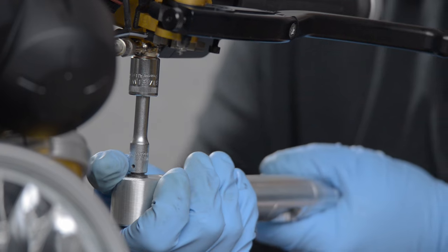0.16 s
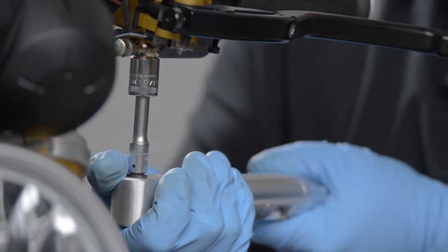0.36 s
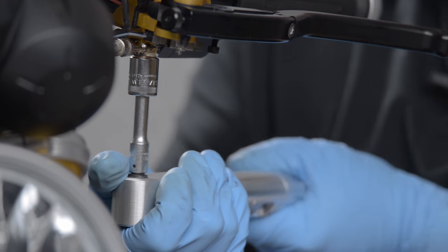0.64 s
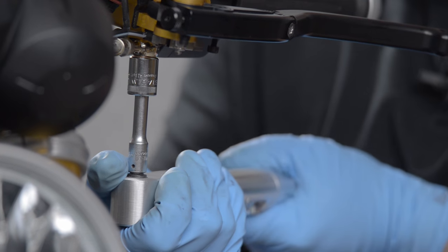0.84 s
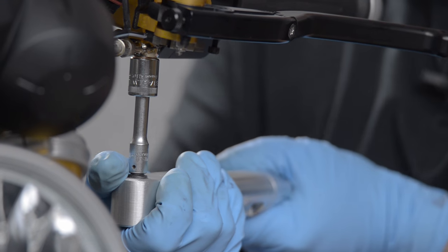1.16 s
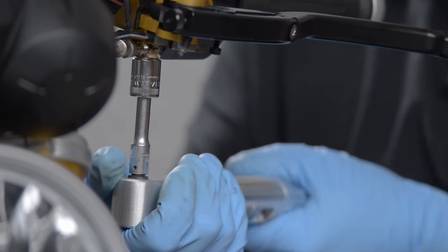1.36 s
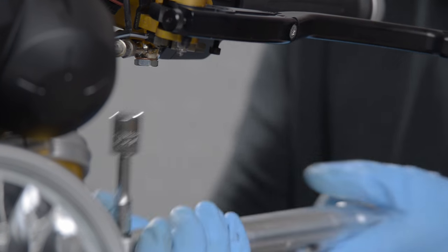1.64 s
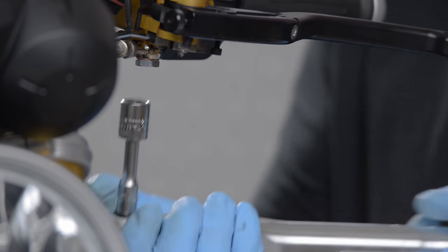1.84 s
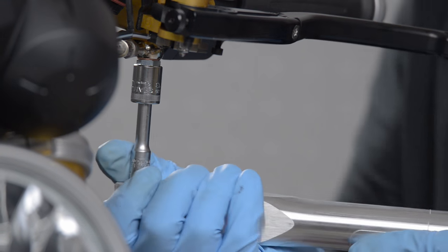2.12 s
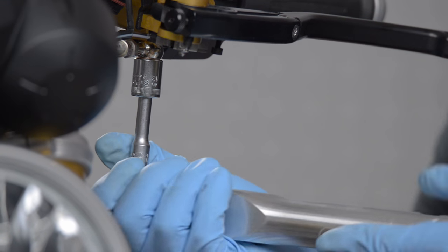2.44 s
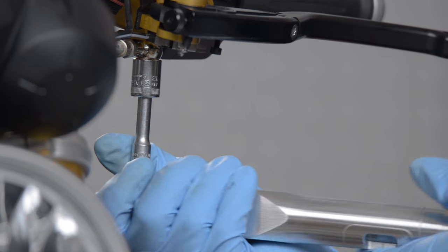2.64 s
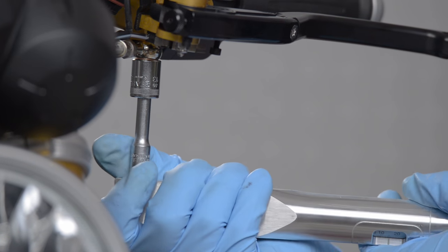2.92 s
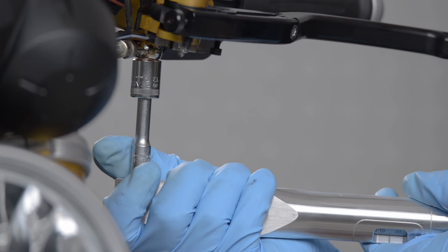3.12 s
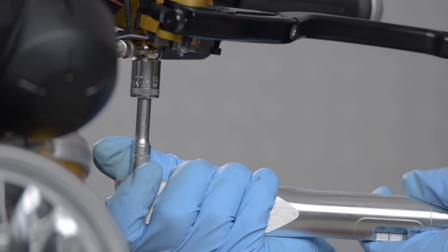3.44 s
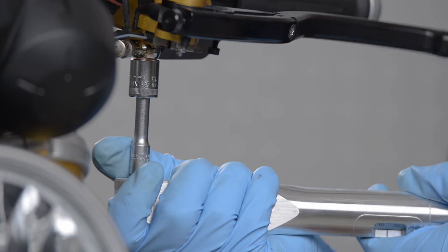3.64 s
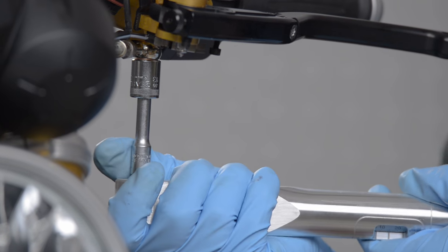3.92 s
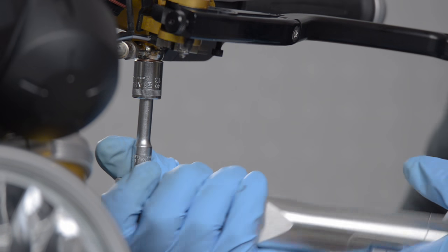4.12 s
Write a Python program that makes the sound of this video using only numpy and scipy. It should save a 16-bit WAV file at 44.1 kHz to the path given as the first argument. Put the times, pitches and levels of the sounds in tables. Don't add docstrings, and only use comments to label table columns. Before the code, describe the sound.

A gloved hand works a click-type torque wrench beside the microphone. Tiny creaking ticks precede one explosive, hard metallic click; gloves rustle, bright steel clinks and loose socket rattle follow, then a duller clack as it seats again. Some handling ticks, a quiet pause, a second click loud enough to clip, ringing nearby machine metal, and a small final scrape and knock. Small room, faint steady hum.

```python
import sys
import numpy as np
from scipy import signal
from scipy.io import wavfile
from scipy.ndimage import uniform_filter1d

SR = 44100
rng = np.random.default_rng(int(sys.argv[2]) if len(sys.argv) > 2 else 0)


def linear_from_db(decibels):
    return 10 ** (np.asarray(decibels, float) / 20)


def inscribe(sig):
    pcm = np.round(np.clip(np.atleast_2d(sig).T, -1, 1) * 32767)
    wavfile.write(sys.argv[1], SR, pcm.astype(np.int16))


N = 188042

# (frequency [Hz], level [dB])
PLAIN_WALLS = [(100, 0.5), (15000, -4)]


def evened(x):
    return x / np.sqrt(np.mean(x ** 2) + 1e-20)


def read(points, hz):
    f, value = np.transpose(points)
    return np.interp(np.log(hz + 1), np.log(f + 1), value)


def add(mix, start_s, sound):
    part = mix[round(start_s * SR):][:len(sound)]
    part += sound[:len(part)]


def noise(field_db, patchy_db):
    t = np.arange(N // 128 + 5) * 128 / SR
    hz = np.fft.rfftfreq(512, 1 / SR)
    real, imag, patches = rng.standard_normal((3, len(t), len(hz)))
    patches = uniform_filter1d(patches, size=14, axis=0)
    patches = evened(uniform_filter1d(patches, size=8, axis=1))
    z = (real + 1j * imag) * linear_from_db(field_db(t[:, None], hz) + patchy_db * patches)
    return signal.istft(z.T, nperseg=512, noverlap=384)[1][:N]


def hum():
    # (frequency [Hz], density [dB per Hz])
    hum_colour = [(55, -56.5), (90, -25), (120, -14), (220, -20), (270, -4), (430, -1.5), (500, -15.5),
                  (700, -8), (880, -7.5), (1050, -13), (2150, -15), (2600, -27), (5000, -34),
                  (11800, -42.5), (12300, -58)]
    # (time [s], level [dB])
    hum_level = [(0.0, 1.5), (4.26, 0.5)]
    swell_db = np.interp(np.arange(N) / SR, *np.transpose(hum_level))
    steady = noise(lambda t, hz: read(hum_colour, hz) + 0 * t, patchy_db=0.5)
    return linear_from_db(-68 + swell_db) * evened(steady)


def rumble():
    # (time [s], level [dB], t60 [s])
    jolts = [
        (.75, -52, .3),
        (.8, -68.5, 2.1),
        (1.57, -75, .5),
        (1.75, -66, .3),
        (2.97, -72, .3),
        (3.686, -54, .5),
        (4.16, -68, 0.37),
    ]
    floor_db, rise_s = -79.5, .015
    band = signal.butter(2, [22, 105], "bandpass", fs=SR, output="sos")
    shake = signal.sosfilt(band, rng.standard_normal(N))
    level, t = np.full(N, linear_from_db(floor_db)), np.arange(SR) / SR
    for start_s, db, t60_s in jolts:
        add(level, start_s, linear_from_db(db - 60 * t / t60_s) * np.minimum(t / rise_s, 1))
    return level * evened(shake)


def shop(x, colour):
    # (frequency [Hz], t60 [s])
    room_t60 = [(100, 0.25), (400, 0.22), (1200, .39), (3000, .39), (6000, 0.37), (10000, 0.36),
                (15000, .26)]
    # (frequency [Hz], level [dB])
    panel_colour = [(300, -30), (900, -21.5), (1600, -14.5), (2200, -24), (3000, -15), (4000, -22.5),
                    (5400, -14.5), (6500, -25.5), (9000, -45)]
    t = np.arange(SR // 2) / SR
    near = 4.0 * linear_from_db(-60 * t / 0.065)
    taps = rng.standard_normal(len(t)) * (1 + near)
    hz, frame_s, z = signal.stft(taps, SR, nperseg=256)
    room = linear_from_db(-60 * frame_s / read(room_t60, hz)[:, None])
    far = linear_from_db(read(panel_colour, hz)[:, None] - 60 * frame_s / .75)
    tail = signal.istft(z * linear_from_db(read(colour, hz))[:, None] * (room + far), SR, nperseg=256)[1]
    tail *= np.clip(np.arange(len(tail)) / SR / .003, 0, 1) ** 2
    return signal.fftconvolve(x, tail / np.linalg.norm(tail))[:N]


def rub():
    # (start [s], length [s], level [dB], swell over the stroke [dB], grip [-1..1.2])
    strokes = [(0, .1, -67, -11, -0.36), (.1, 0.51, -79, 3, 0), (0.595, 0.12, -76, 6, .9),
               (.9, .3, -77, 0, -.6), (1.24, .31, -70, 3, 0), (1.562, .13, -64.5, 0, .4),
               (1.69, .2, -64.5, -1, 1.2), (1.89, .05, -67, -2, .2), (1.96, .14, -74, 2, -.3),
               (2.1, 0.28, -72, 0.5, -0.59), (2.37, 0.11, -76, 0, -.3), (2.51, .18, -68, 2.5, .2),
               (2.686, .12, -61.5, 0, -0.31), (2.82, .17, -74, 1, -.5), (3, .5, -79, -4.5, 0.19),
               (4.04, .13, -75, 8, -.9), (4.17, .15, -63, 3, -.3)]
    # (frequency [Hz], level [dB])
    rub_colour = [(300, -59.5), (600, -20.5), (1000, -4.5), (1800, -1), (3000, -4), (5000, -6),
                  (8000, -12.5), (11000, -18.5), (16000, -20.5)]
    rise_s, fall_s = 0.052, .035
    bright_db_per_octave, cup_db = 2, 5

    def field_db(t, hz):
        cup = cup_db * np.exp(-((hz - 3800) / 800) ** 2)
        firm_db = cup + bright_db_per_octave * np.log2(np.clip(hz, 1000, 16000) / 4000)
        power = 1e-12
        for start_s, length_s, db, swell_db, grip in strokes:
            rise = (t - start_s) / rise_s + .5
            fall = (start_s + length_s - t) / fall_s + .5
            on = np.clip(np.minimum(rise, fall), 0, 1)
            progress = np.clip((t - start_s) / length_s, 0, 1)
            power = power + (on * linear_from_db(db + swell_db * progress + grip * firm_db)) ** 2
        return read(rub_colour, hz) + 10 * np.log10(power)

    slips = evened(uniform_filter1d(rng.standard_normal(N), size=70))
    grain = linear_from_db(1.3 * np.clip(slips, 0, 3) ** 2)
    return linear_from_db(-16.5) * noise(field_db, patchy_db=1.8) * grain


def ticks(rows, tube_db, stand_db, edge_db, edge_hz, t60_s):
    out, t = np.zeros(N), np.arange(2000) / SR
    scrapes = rng.standard_normal((len(rows), len(t)))
    for (start_s, db, pitch_hz, *lift_db), scrape in zip(rows, scrapes):
        drive = scrape * linear_from_db(-60 * t / max(t60_s, .001))
        spots = [(min(pitch_hz, 15000), 1.7, 0), (1650, 1.7, tube_db + sum(lift_db)),
                 (520, 2.5, stand_db), (edge_hz, 1.8, edge_db)]
        for spot_hz, sharp, part_db in spots:
            spot = signal.iirpeak(spot_hz, sharp, SR)
            part = signal.lfilter(*spot, signal.lfilter(*spot, drive))
            add(out, start_s, linear_from_db(db + part_db) * part / abs(part).max())
    return out


def thread_creaks():
    # (time [s], peak [dB], pitch [Hz])
    slips = [(.006, -51, 4500), (.0152, -51.5, 4200), (.0272, -51.5, 3830), (.076, -52, 4500),
             (.0792, -53.5, 5470), (.111, -52, 4770), (.1165, -52, 3800), (.1565, -53, 4460),
             (.1606, -55, 3810), (.1815, -53, 4950), (.2258, -57, 3860), (.2372, -51, 4100),
             (.2592, -64, 4000), (.2981, -60, 4000), (.3082, -52, 4200), (.3195, -56, 4500),
             (.3545, -55, 5300), (.3629, -55, 3810), (.3834, -60, 4130), (.4054, -63, 5630),
             (.4324, -52, 4000), (.436, -54, 3600), (.4542, -61, 3561), (.4682, -58, 5496),
             (.4788, -53, 4240), (.5985, -53, 4258), (.6235, -53, 5070), (.6674, -55, 3999),
             (.6735, -53, 4603), (.7055, -56, 4207)]
    return ticks(slips, tube_db=-4, stand_db=-17, edge_db=-8, edge_hz=7000, t60_s=.0035)


def socket_rattle():
    # (time [s], peak [dB], pitch [Hz], tube lift [dB])
    rattles = [(1.3443, -62, 3400, 0), (1.3988, -57, 3290, 0), (1.4366, -60, 3360, 0),
               (1.5714, -56, 4870, 0), (1.6051, -51.5, 5050, 4.5), (1.6698, -51, 4147, 3),
               (1.7339, -39, 3566, -2.5), (1.7549, -42, 3370, 3), (1.793, -48.5, 3870, 6),
               (1.8037, -48, 3250, 0), (1.8195, -57, 3920, 3), (1.838, -53, 3680, -6),
               (1.865, -52, 3364, 0), (1.8537, -51, 3400, -4), (1.9011, -53, 5500, 3),
               (1.9074, -56, 3390, 0), (1.9299, -45, 6850, 0), (1.9476, -53, 5750, 1),
               (1.991, -58, 4500, 0)]
    return ticks(rattles, tube_db=-8, stand_db=-18.5, edge_db=-11, edge_hz=8200, t60_s=.0055)


def socket_fumble():
    # (time [s], peak [dB], pitch [Hz], tube lift [dB])
    touches = [(2.149, -46, 5150, -2.5), (2.2605, -51, 3200, 0), (2.2892, -48.5, 4820, 1),
               (2.3095, -45, 2594, 2.5), (2.3284, -50.5, 4140, 0), (2.3345, -49, 4120, 3.5),
               (2.4478, -48, 2600, -3), (2.5985, -58, 4500, -3), (2.5114, -61, 3770, -3),
               (2.7074, -55, 2930, -2), (2.8004, -53, 3700, -5), (2.8114, -62, 3240, 3),
               (2.8504, -59, 4357, 1), (2.8834, -63, 3950, -3), (2.9624, -57.5, 5120, -2),
               (3.2424, -64, 3402, 0)]
    return ticks(touches, tube_db=0, stand_db=-7, edge_db=-9, edge_hz=7200, t60_s=.009)


def socket_lift():
    # (time [s], peak [dB], pitch [Hz], tube lift [dB])
    rim_scrapes = [
        (4.0551, -62, 3305, 0),
        (4.1075, -64, 2520, 4),
        (4.1534, -60, 2490, 1),
        (4.1703, -33.5, 4400, -2),
        (4.188, -53, 1700, 0),
    ]
    return ticks(rim_scrapes, tube_db=-10, stand_db=-20, edge_db=-7, edge_hz=9000, t60_s=.009)


def steel_clinks():
    # (time [s], peak [dB], pitch [Hz], tube lift [dB])
    clinks = [
        (1.5602, -36, 5550, -2.5),
        (1.6288, -47, 3810, 0),
        (1.641, -60, 9000, 3),
        (1.8836, -52, 6500, 0),
        (1.9594, -63, 8000, 0),
        (1.977, -61, 6000, 0),
    ]
    return ticks(clinks, tube_db=-11, stand_db=-24, edge_db=-3, edge_hz=10000, t60_s=.005)


def decays(rows):
    out, t = np.zeros(N), np.arange(SR) / SR
    for start_s, db, hz, t60_s in rows:
        tone = np.sin(2 * np.pi * hz * t) * (1 - np.exp(-t / .0006))
        add(out, start_s, linear_from_db(db - 60 * t / t60_s) * tone)
    return out


def knock_rings():
    # (time [s], level [dB], frequency [Hz], t60 [s])
    knocks = [(2.066, -60, 269, .2), (2.078, -57, 674, 0.14), (2.262, -60, 470, .12), (2.3, -61, 509, .1),
              (2.328, -56.5, 490, 0.13), (2.328, -61, 289, 0.27), (2.45, -60, 490, .1),
              (3.7, -54, 255, 0.41), (3.705, -47, 1510, .4), (3.705, -46, 2890, .45),
              (3.705, -50, 5250, .3), (3.73, -58.5, 421, 0.26)]
    return decays(knocks)


def blow(slaps, modes, peak_db, wet_db, tuned_db):
    # (frequency [Hz], level [dB])
    click_colour = [(60, -15.5), (150, -9.5), (320, -13), (500, -9.5), (900, -6.5), (1550, -2.5),
                    (2300, -5), (3000, -3.5), (5300, -4.5), (6500, -10.5), (9000, -12), (12000, -15.5),
                    (16000, -19.5)]
    steel_above_hz = 2200
    t, direct = np.arange(3000) / SR, np.zeros(N)
    steel, body = np.zeros(len(t)), np.zeros(len(t))
    for k, (hz, width_hz, db) in enumerate(modes):
        decay = np.exp(-np.pi * width_hz * t)
        ring = (-1) ** k * linear_from_db(db) * width_hz * decay * np.sin(2 * np.pi * hz * t)
        if hz > steel_above_hz:
            steel += ring
        else:
            body += ring
    for start_s, db, body_db in slaps:
        add(direct, start_s, linear_from_db(db) * (steel + linear_from_db(body_db) * body))
    direct = signal.sosfilt(signal.butter(2, 150, "highpass", fs=SR, output="sos"), direct)
    snap = np.arange(N) == abs(direct).argmax()
    wet = shop(snap, click_colour) * np.linalg.norm(direct)
    wet = wet + linear_from_db(tuned_db) * shop(direct, PLAIN_WALLS)
    return linear_from_db(peak_db) * (direct + linear_from_db(wet_db) * wet) / abs(direct).max()


def seating():
    # (time [s], blow [dB], extra on the heavy body [dB])
    seat_slaps = [
        (2.0592, -3.5, -2),
        (2.0602, 2.5, 5.5),
        (2.0630, -5, -10),
        (2.0642, 5, -5.5),
        (2.0668, -6, 7),
    ]
    # (frequency [Hz], width [Hz], level [dB])
    seat_modes = [(400, 64, -2.5), (700, 70, -6), (1010, 120, -7), (1780, 235, 1.5), (2460, 600, -8),
                  (4280, 840, -4.5), (5780, 1360, -7), (8200, 700, -10), (10320, 720, -14),
                  (14430, 800, -19)]
    return blow(seat_slaps, seat_modes, peak_db=-23.5, wet_db=-12, tuned_db=-1)


def first_break_over():
    # (time [s], blow [dB], extra on the heavy body [dB])
    first_slaps = [
        (.7252, -11, -4),
        (.7256, -8, 2.5),
        (.7261, 0.5, -4),
        (.7267, 2.5, -8.5),
        (.7279, -11, 10.5),
        (.7318, -22, 2),
        (.7425, -26, -1),
    ]
    # (frequency [Hz], width [Hz], level [dB])
    first_modes = [(453, 55, 1), (820, 220, -9.5), (1200, 200, -5.5), (1480, 280, -12), (1930, 320, -1),
                   (2450, 440, -12), (3540, 440, -4.5), (4380, 620, 2), (5470, 480, -6), (6129, 400, -15),
                   (7920, 310, -0.5), (10553, 470, -8.5), (12100, 700, -17), (13500, 500, -17)]
    # (frequency [Hz], level [dB], t60 [s])
    steel_rings = [(7314, -68, 1.), (5680, -61.5, .6), (850, -67, 1.5), (230, -58, .8)]
    click = blow(first_slaps, first_modes, peak_db=0.84, wet_db=-10.0, tuned_db=-11)
    return click + decays([(first_slaps[0][0], db, hz, t60_s) for hz, db, t60_s in steel_rings])


def second_break_over():
    # (time [s], blow [dB], extra on the heavy body [dB])
    second_slaps = [
        (3.6861, -8, 8.5),
        (3.6866, 14, -8.5),
        (3.6876, -3, -0.5),
        (3.6887, -5, 7.5),
        (3.6899, -4, 3),
        (3.6922, -24, -5),
        (3.7015, -20, -7),
    ]
    # (frequency [Hz], width [Hz], level [dB])
    second_modes = [(455, 69, 0), (1090, 300, -9), (1558, 240, -2), (2460, 490, -14.5), (3144, 420, -5.5),
                    (4200, 560, -4), (5326, 600, -3.5), (6768, 400, -6), (8200, 240, -11),
                    (9940, 600, -15.5), (12105, 600, -15), (13596, 990, -19.5), (640, 150, -16)]
    return blow(second_slaps, second_modes, peak_db=6.0, wet_db=-10.5, tuned_db=-7.0)


def scene():
    background = hum() + rumble()
    small = thread_creaks() + socket_rattle() + socket_fumble() + socket_lift() + steel_clinks()
    small += linear_from_db(-17) * shop(small, PLAIN_WALLS)
    wrench = seating() + first_break_over() + second_break_over()
    return (background + rub() + small + knock_rings() + wrench)[None]


def low_pass(x):
    return signal.sosfilt(signal.butter(12, 16380, fs=SR, output="sos"), x)


def record(dry):
    faint_hz, faint_db, faint_cut_db, edge_hz = 12000, -113, -20, 15850
    hz, _, z = signal.stft(dry, SR, nperseg=1024)
    power = uniform_filter1d(abs(z) ** 2, size=16, axis=1)
    power = uniform_filter1d(power, size=3, axis=2)
    faint = (power < linear_from_db(2 * faint_db)) & (hz[:, None] > faint_hz)
    faint_treble = signal.istft(z * faint, SR, nperseg=1024)[1][:, :N]
    kept = dry - (1 - linear_from_db(faint_cut_db)) * faint_treble
    lowpass = signal.firwin(201, edge_hz, fs=SR)[None]
    limited = signal.oaconvolve(np.clip(kept, -1, 1), lowpass, "same")
    return low_pass(np.clip(limited, -1, 1))


dry = scene()
out = record(dry)
inscribe(out)
```